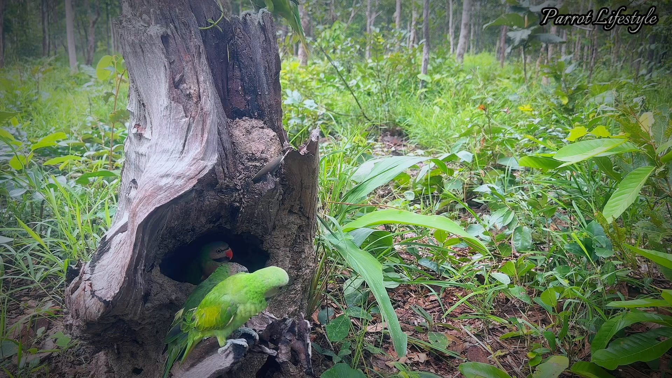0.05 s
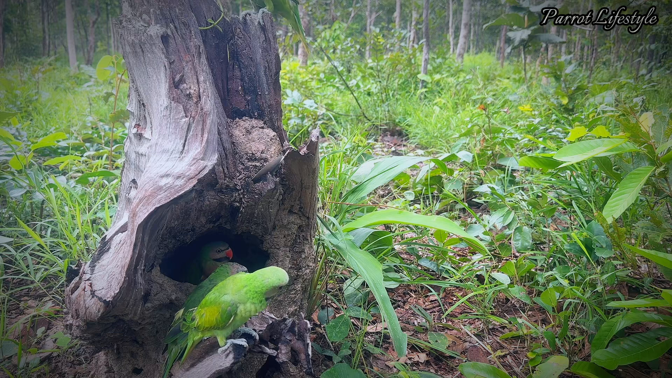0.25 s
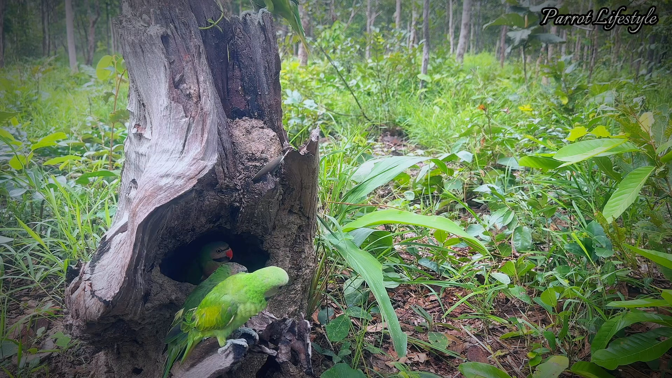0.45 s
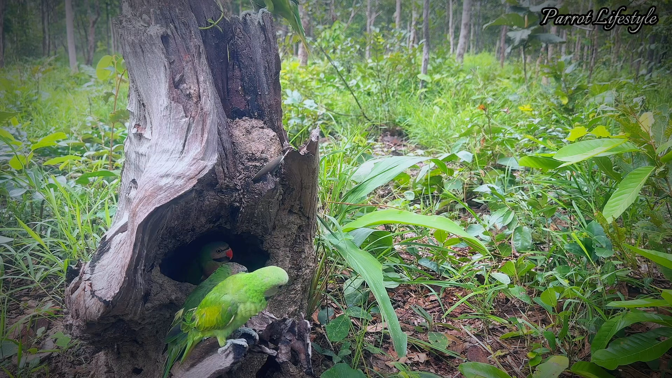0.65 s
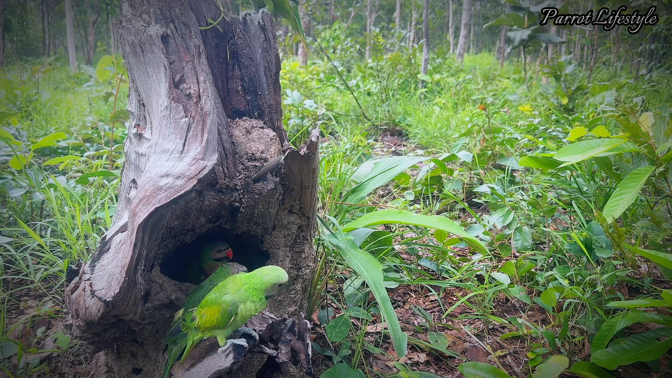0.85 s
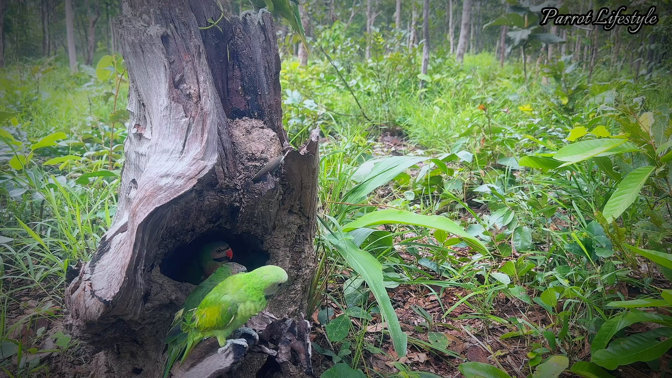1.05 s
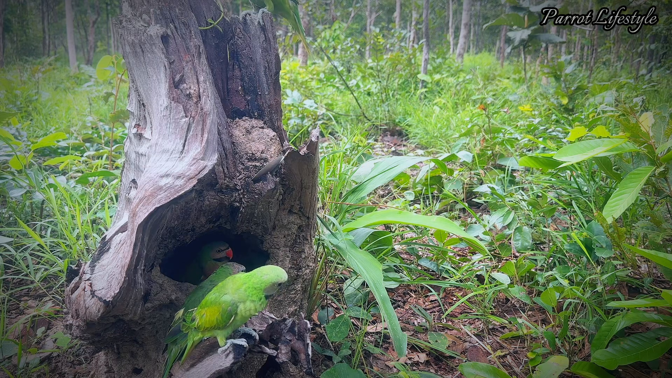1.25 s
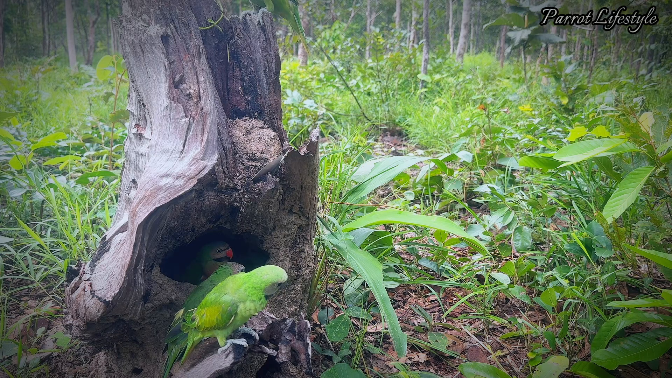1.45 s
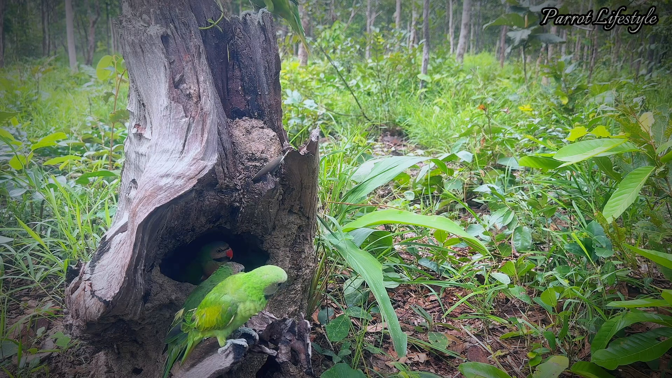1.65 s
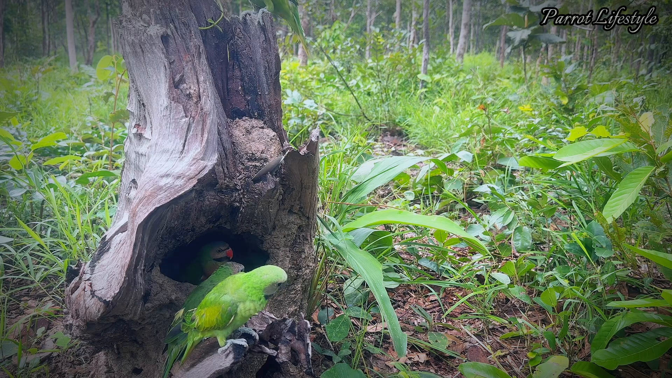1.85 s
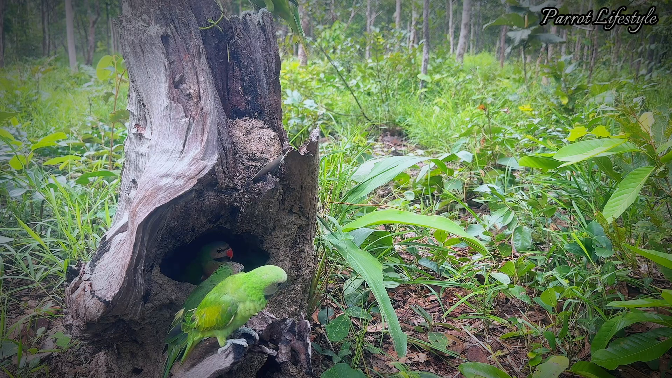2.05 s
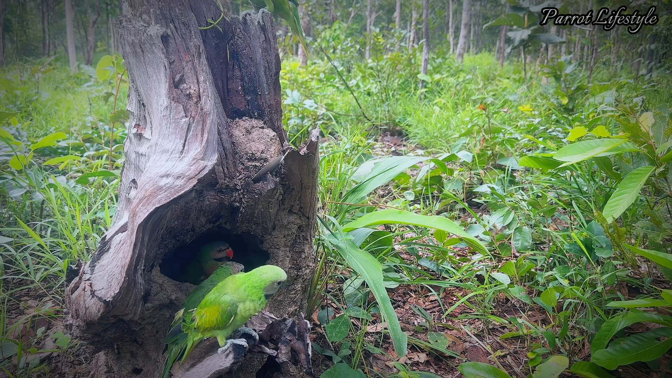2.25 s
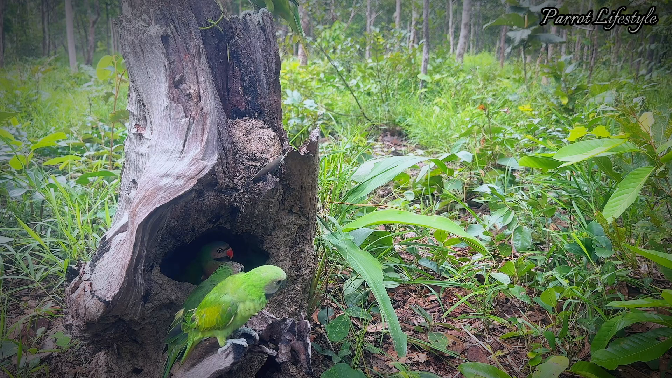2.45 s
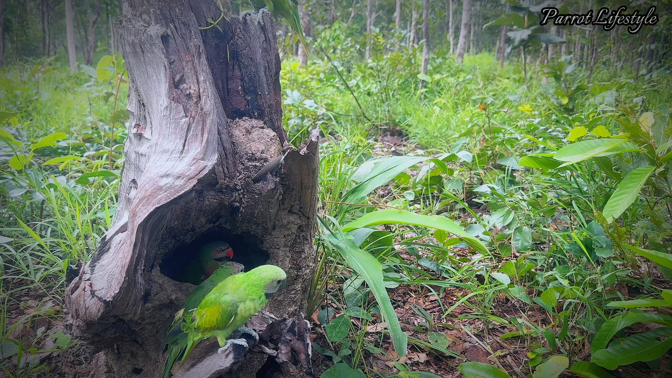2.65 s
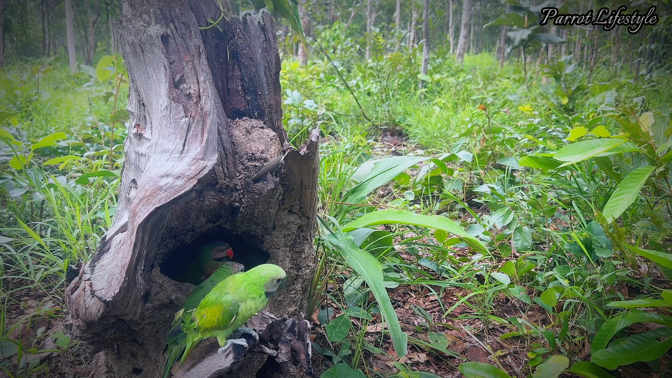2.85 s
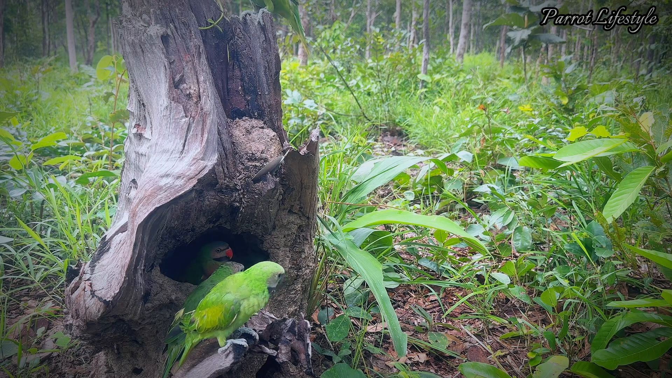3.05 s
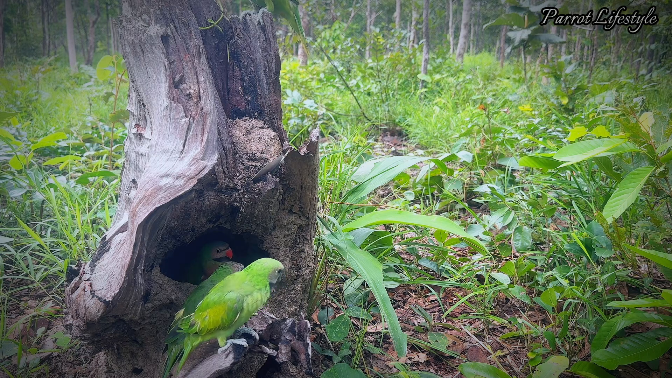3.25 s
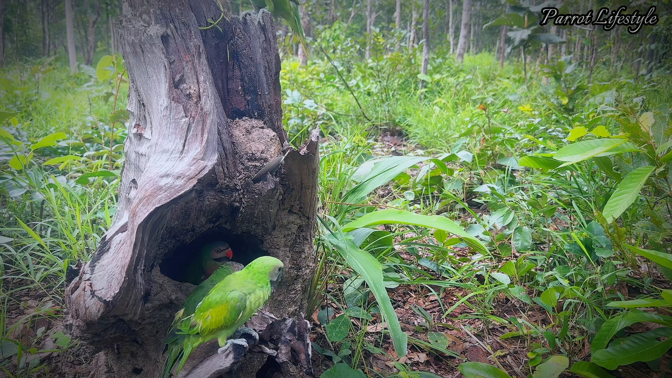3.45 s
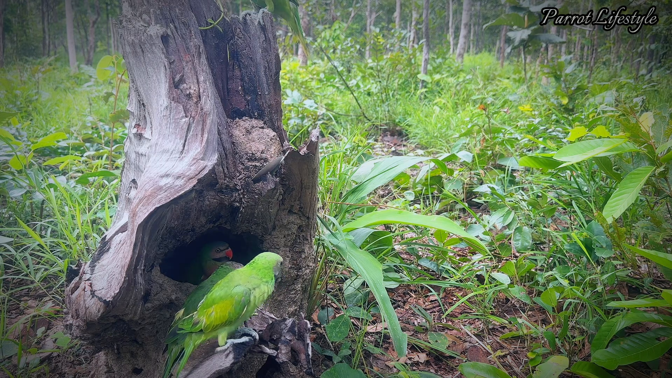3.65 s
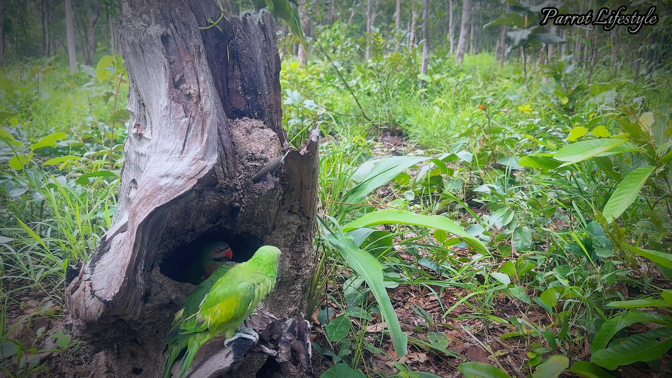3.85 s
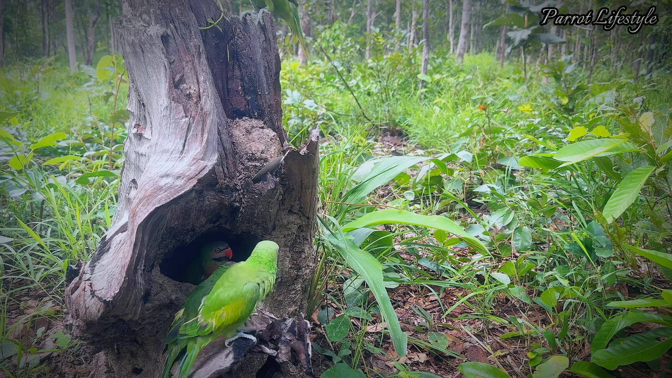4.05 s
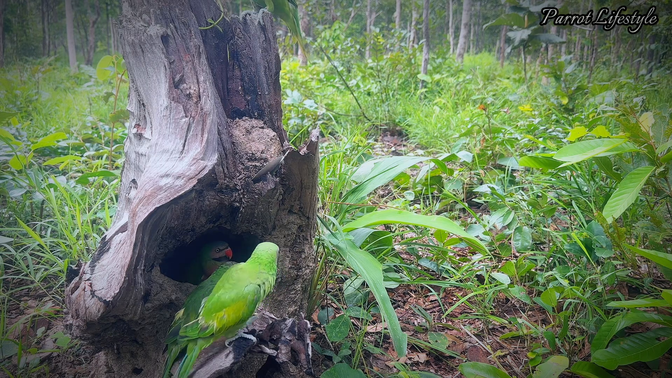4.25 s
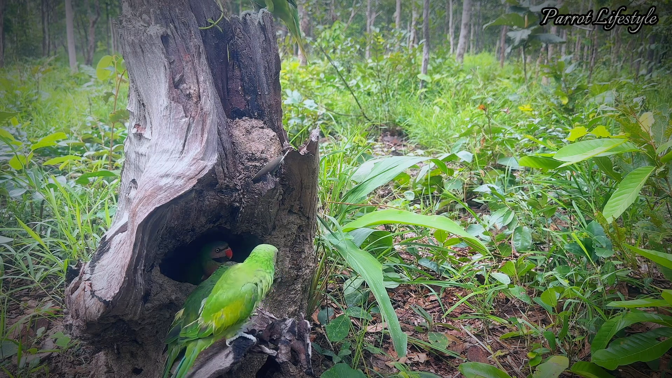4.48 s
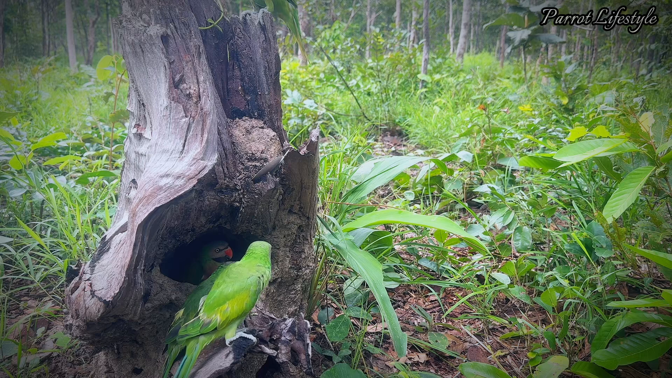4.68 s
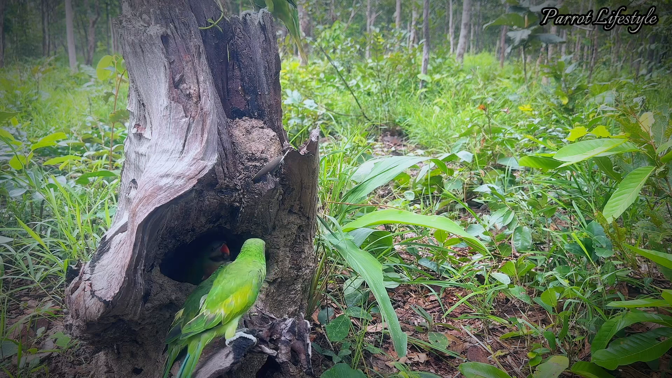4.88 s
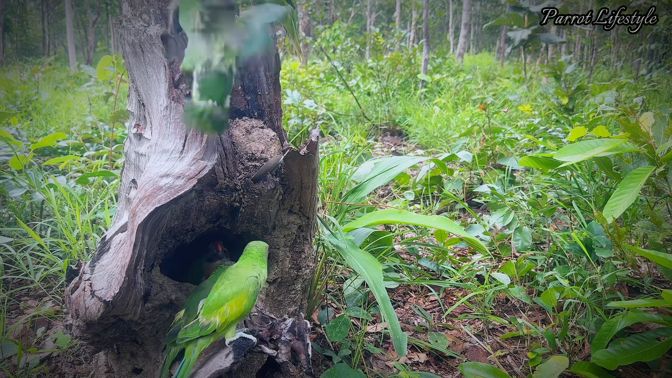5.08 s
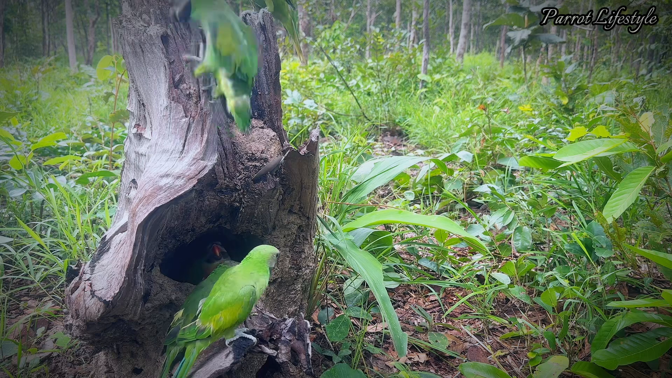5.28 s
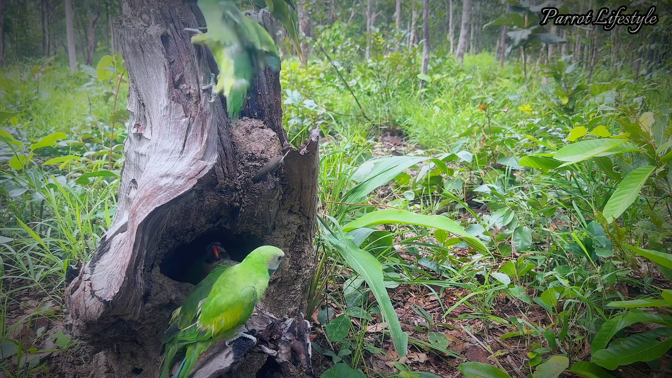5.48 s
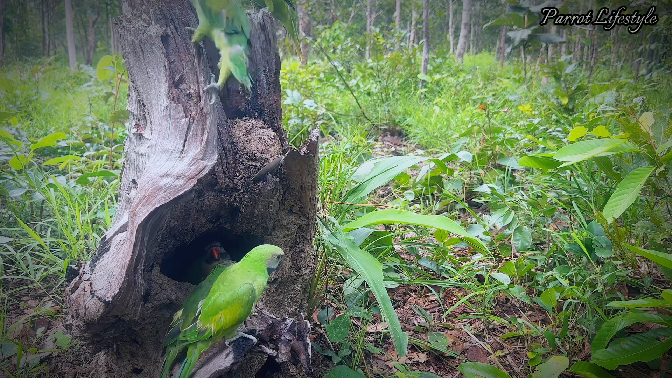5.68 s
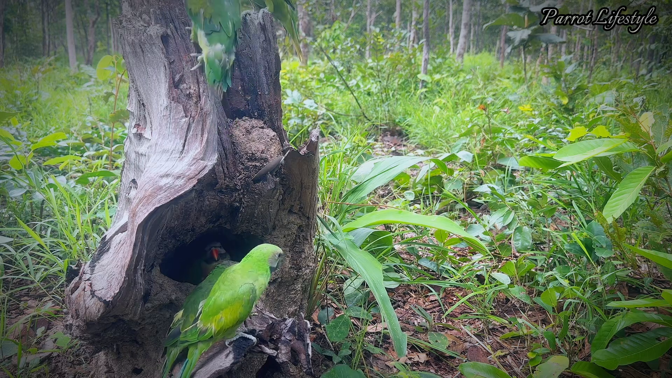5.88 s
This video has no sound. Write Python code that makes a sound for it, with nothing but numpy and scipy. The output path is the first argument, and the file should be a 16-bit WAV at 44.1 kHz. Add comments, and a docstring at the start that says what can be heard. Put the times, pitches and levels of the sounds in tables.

```python
"""Parakeets at a dead tree stump in a quiet wood: beaks and claws knock on it and pick off splinters.
One short squeak glides up and down, most likely a beak sticking and slipping on the wood.
A bird flutters in close to the microphone, lands on the trunk and scrabbles for a hold.
Far insects hiss throughout over a low rumble. Mono, with faint echoes from ground and trunks."""
import sys
import numpy as np
from scipy import signal
from scipy.fft import rfft, irfft, next_fast_len
from scipy.io import wavfile
from scipy.ndimage import map_coordinates

SR = 44100
rng = np.random.default_rng(int(sys.argv[2]) if len(sys.argv) > 2 else 0)


def materialize(psi):
    """Save the field psi as 16-bit PCM at rate SR to the path in sys.argv[1].

    A 1-D psi becomes a single channel; in a 2-D psi each row is a channel.
    """
    bounded = np.clip(np.atleast_2d(psi).T, -1, 1)
    quanta = np.round(bounded * 32767).astype(np.int16)
    wavfile.write(sys.argv[1], SR, quanta)


N = 261072

# spectrum of feathers rubbing on air and wood: (frequency [Hz], level [dB])
FEATHER_SPECTRUM = [(120, -9), (200, 1), (249, 1), (448, -1), (749, -1.5), (1100, -3.5), (1480, -1),
                    (2470, -8.5), (4950, -10), (5940, -20), (7270, -17), (16000, -31.5)]


def amp(db):
    """Decibels to gain."""
    return 10 ** (np.asarray(db) / 20)


def unit(x):
    """x at rms 1."""
    return x / np.sqrt(np.mean(x ** 2) + 1e-20)


def unit_peak(x):
    """x at peak 1."""
    return x / np.abs(x).max()


def unit_attack(x):
    """x at rms 1 over its first 10 ms."""
    return x / np.sqrt(np.mean(x[:SR // 100] ** 2))


def add(out, s, x):
    """Mix x into out from time s."""
    part = out[round(s * SR):][:len(x)]
    part += x[:len(part)]


def curve(points):
    """One value per sample through (time [s], value) points."""
    times, values = np.transpose(points)
    return np.interp(np.arange(N) / SR, times, values)


def wobble(rate):
    """A smooth random curve, rate knots a second."""
    return map_coordinates(rng.standard_normal(int(N * rate / SR) + 4), [np.arange(N) * rate / SR])


def swells(rows, shape=1.7):
    """Gain of movements that swell and fade alike: (middle [s], half length [s], level [dB])."""
    t = np.arange(N) / SR
    return sum(amp(db) * np.exp(-np.abs((t - s) / half) ** shape) for s, half, db in rows)


def colour(points, hz):
    """Gain of (frequency [Hz], level [dB]) points joined on a log axis."""
    f, db = np.transpose(points)
    return amp(np.interp(np.log(hz + 1), np.log(f + 1), db))


def filtered(x, response):
    """x through a complex response of frequency."""
    size = next_fast_len(len(x) + SR // 10)
    return irfft(rfft(x, size) * response(np.fft.rfftfreq(size, 1 / SR)), size)[:len(x)]


def resonance(f, hz, width):
    """Causal response of one resonance."""
    return 1j * f * width / (hz * hz - f * f + 1j * f * width)


def minimum_phase(spectrum, size=4096):
    """Impulse response with this spectrum and no sound ahead of the blow."""
    cepstrum = irfft(np.log(colour(spectrum, np.fft.rfftfreq(size, 1 / SR))))
    cepstrum[1:size // 2] *= 2
    cepstrum[size // 2 + 1:] = 0
    return irfft(np.exp(rfft(cepstrum)))


def noise(spectrum, grain_db=0):
    """Coloured noise of rms 1; grain_db clumps it into millisecond grains."""
    grains = rng.standard_normal(N) * amp(grain_db * wobble(900))
    return unit(filtered(grains, lambda f: colour(spectrum, f)))


def burst(length):
    """A crackle that dies by 30 dB in length seconds."""
    t = np.arange(SR // 10) / SR
    return rng.standard_normal(len(t)) * amp(-30 * t / length)


def forest(hiss_db=-65, rumble_db=-72, swell_hz=1.125, crest_s=0.36):
    """The wood in the distance: hiss, rumble and two insect bands, one steady, one swelling."""
    # spectra of the far hiss and rumble: (frequency [Hz], level [dB])
    hiss = [(250, -13.5), (450, -5), (800, -11.5), (1200, -7), (1700, -2), (2800, -1), (3900, -2.5),
            (5100, -1.5), (6200, -12), (7500, -10.5), (8500, -18), (9600, -30), (13500, -37.5),
            (16000, -44)]
    rumble = [(15, -64), (25, -28), (50, -9.5), (70, 2), (113, 0), (279, -13), (328, -12.5), (400, -22),
              (520, -39), (880, -120)]
    # far insects: (centre [Hz], width [Hz], level [dB], swing either way [dB])
    insects = [(4910, 760, -75.5, 0), (7180, 810, -88, 10)]
    t = np.arange(N) / SR
    out = amp(hiss_db + 0.11 * wobble(2.1)) * noise(hiss)
    out += amp(rumble_db + wobble(6)) * noise(rumble)
    for hz, width, db, swing_db in insects:
        band = unit(filtered(rng.standard_normal(N), lambda f: resonance(f, hz, width) ** 2))
        out += amp(db + swing_db * np.cos(2 * np.pi * swell_hz * (t - crest_s))) * band
    return out


def echoes(x, t60_s=0.18, delay_s=0.0072):
    """Ground and nearby trunks return a short, dense tail of reflections."""
    t = np.arange(SR // 4) / SR
    tail = rng.standard_normal(len(t)) * amp(-60 * t / t60_s) * (t > delay_s)
    return signal.fftconvolve(x, tail / np.linalg.norm(tail))[:N]


def rustle():
    """Feathers brush the wood, claws scratch for a hold, birds shuffle dully inside the hollow."""
    # movements at the stump: (middle [s], half length [s], level [dB])
    brushes = [(.28, 0.076, -68.5), (.55, 0.23, -69), (1.42, 0.13, -70), (4.675, 0.032, -55.5),
               (4.76, 0.11, -52), (4.98, 0.15, -63), (5.32, 0.12, -66.5), (5.85, 0.2, -71.5)]
    scratches = [(4.7, .06, -62), (5.02, 0.044, -64), (5.14, 0.041, -64.5), (5.31, 0.031, -62),
                 (5.38, 0.012, -58), (5.44, 0.022, -62)]
    shuffles = [(.3, 0.054, -65.5), (.7, 0.066, -72), (1.33, 0.25, -75), (2.56, 0.2, -74.5)]
    # spectra of claws and of shuffling: (frequency [Hz], level [dB])
    scratch_spectrum = [(600, -22), (2000, 4), (5000, 10.5), (7000, -6), (11000, -5), (15000, 0)]
    shuffle_spectrum = [(60, -10), (120, -6), (250, -5.5), (550, -12), (1000, -11.5), (2500, -22),
                        (6000, -50)]
    brushing = swells(brushes) * amp(2.6 * wobble(35)) * noise(FEATHER_SPECTRUM, grain_db=3.5)
    scratching = swells(scratches) * noise(scratch_spectrum)
    shuffling = swells(shuffles) * amp(1.9 * wobble(24.26)) * noise(shuffle_spectrum)
    return brushing + scratching + shuffling


def splinters(snap_s=0.016):
    """Dry fibres and bark flakes snap in short bright crackles."""
    # snaps: (time [s], peak level [dB])
    snaps = [(1.098, -41.5), (1.21, -52), (1.337, -39.5), (1.4176, -37.5), (2.246, -50), (2.256, -44),
             (2.264, -38), (2.521, -47), (2.865, -54.5), (5.121, -53), (5.167, -50), (5.789, -45),
             (5.83, -54)]
    # spectrum of a snap: (frequency [Hz], level [dB])
    spectrum = [(500, -34), (1500, -5.5), (3000, -4.5), (4800, 1), (6500, 0), (9000, -5.5), (12000, -12),
                (15500, -4.5)]
    out = np.zeros(N)
    for s, db in snaps:
        snap = filtered(burst(snap_s), lambda f: colour(spectrum, f))
        add(out, s, amp(db) * unit_peak(snap))
    return out


def squeak(jitter=0.04, scatter_db=2.4, grit_db=-11, rasp_db=-11, bite=0.7, travel_s=0.00222):
    """Stick and slip: each slip pulses the resonances; fast slips whistle, slow uneven ones creak."""
    # the glide: (time [s], slip rate [Hz])
    glide = [(3.3105, 380), (3.321, 550), (3.333, 900), (3.342, 1650), (3.344, 2480), (3.354, 2560),
             (3.358, 1400), (3.363, 1130), (3.374, 580), (3.399, 440), (3.404, 1070), (3.425, 1000),
             (3.444, 810), (3.452, 365), (3.501, 255)]
    # how hard the beak presses: (time [s], level [dB])
    pressure = [(3.310, -45), (3.327, -33.5), (3.3555, -32), (3.3585, -24.5), (3.384, -29), (3.412, -40),
                (3.463, -43), (3.502, -53)]
    # broad resonances under the slips, and the rasp of fibres: (frequency [Hz], level [dB])
    body_spectrum = [(200, -25), (420, -6), (950, -5), (1550, 0.5), (2150, -5), (2750, -3), (3500, -10),
                     (4500, -7.5), (5200, -4), (6100, -22), (7200, -33), (8250, -23), (9500, -46),
                     (14300, -56)]
    rasp_spectrum = [(1000, -32), (2700, -13), (4000, -1), (5200, -4), (6300, -1), (7200, -22), (8250, 6),
                     (9800, -18), (12300, -52), (14300, -12)]
    even_above_hz, roughest, smoothest = 750, 0.93, 0.19
    t = np.arange(N) / SR
    rate = np.exp(curve([(s, np.log(hz)) for s, hz in glide]))
    pressure_db = curve(pressure)
    force = amp(pressure_db) * (t > glide[0][0]) * (t < glide[-1][0])
    rough = smoothest + (roughest - smoothest) / (1 + (rate / even_above_hz) ** 6)
    cycles = np.cumsum(rate * (1 + jitter * rough * wobble(400))) / SR
    slips = np.interp(np.arange(1, int(cycles[-1])), cycles, np.arange(N))
    at = slips.astype(int)
    scatter = amp(scatter_db * rough[at] * rng.standard_normal(len(at)))
    push = force[at] * np.sqrt(SR / rate[at]) * scatter
    # a windowed sinc places each pulse between samples
    taps = at[:, None] + np.arange(-7, 9)
    lag = taps - slips[:, None]
    pulses = push[:, None] * np.sinc(lag) * np.sinc(lag / 8)
    drive = np.bincount(np.clip(taps, 0, N - 1).ravel(), pulses.ravel(), N)
    # loose grit crunches under every slip
    after_slip = unit(np.exp(-2 * (cycles % 1)))
    grit = amp(grit_db) * force * rough * after_slip * rng.standard_normal(N)
    body = minimum_phase(body_spectrum)
    voice = signal.fftconvolve(drive + grit, body / np.linalg.norm(body))[:N]
    # bending waves in wood carry the highs faster than the lows, which spreads each pulse
    voice = filtered(voice, lambda f: np.exp(-2j * np.pi * travel_s * (2 * np.sqrt(1000 * f) - f / 2)))
    # fibres rasp right after each slip, more so under rough, hard pressure
    grip = amp(bite * (pressure_db - pressure_db.max()))
    rasp = force * rough * grip * after_slip * noise(rasp_spectrum)
    return voice + amp(rasp_db) * rasp


def wing_flicks(flick_s=0.0031):
    """The wing tips of the landing bird flick the trunk."""
    # feather strikes: (time [s], peak level [dB], treble tilt [dB/octave])
    flicks = [(4.688, -26.5, 3.5), (4.6995, -31, 10.5), (4.703, -23.5, 2.5), (4.825, -22, 4),
              (4.8975, -25, 2.5), (4.9066, -22.5, -1.5)]
    out = np.zeros(N)
    for s, db, tilt_db in flicks:
        response = lambda f: colour(FEATHER_SPECTRUM, f) * amp(tilt_db * np.log2(1 + f / 1000))
        add(out, s, amp(db) * unit_peak(filtered(burst(flick_s), response)))
    return out


def wingbeats(beats=5, start_s=4.698, beat_s=0.063, braking_s=0.0063, thump_s=0.0043):
    """Beats slow as the bird brakes; each stroke rushes in the feathers and pushes air at the mic."""
    # spectrum of the swirling air: (frequency [Hz], level [dB])
    air_spectrum = [(20, -22), (38, -6), (62, 1), (85, 5.5), (125, -3.5), (220, -12), (380, -8.5),
                    (700, -36)]
    closest_beat, fade_db_per_beat, thump_db, swirl_db = 1, 2, 4, -3
    t = np.arange(N) / SR
    rush, push, thumps = np.zeros((3, N))
    for stroke in range(2 * beats):
        beat, upstroke = stroke / 2, stroke % 2
        s = start_s + beat_s * beat + braking_s * beat * (beat - 1) / 2
        rush_db = -42 - 13 * upstroke
        push_db = -42.5 - fade_db_per_beat * abs(beat - closest_beat) - 1.5 * upstroke
        rush += swells([(s, 0.012, rush_db)], shape=1.16)
        push += swells([(s, 0.021, push_db)], shape=1.3)
        # the passing wing presses, sucks and presses again
        passing = (t - s) / thump_s
        thumps += amp(push_db + thump_db) * (2 * passing ** 2 - 1) * np.exp(-passing ** 2)
    feathers = rush * noise(FEATHER_SPECTRUM, grain_db=2.0)
    swirl = amp(swirl_db) * push * noise(air_spectrum)
    return feathers + thumps + swirl


def knocks(focus=1.8, skid=0.076, ring_share=0.89):
    """Soft blows wake the stump's low modes, hard ones its high modes and a crack that grows with skid."""
    # beak and claw blows: (time [s], attack level [dB], tone centre [Hz], contact length [s])
    blows = [(.548, -62.5, 1100, .002), (.577, -61.5, 900, .002), (.6, -53, 1190, 0.0031),
             (.948, -64, 1430, .002), (1.714, -45.5, 1330, 0.0087), (1.722, -63, 290, 0.0044),
             (4.701, -40.5, 1760, 0.0011), (4.752, -43, 1340, .004), (4.8208, -43, 1190, 0.0036),
             (4.9029, -41.5, 2000, 0.019), (4.9078, -44.5, 444, 0.0066), (4.984, -33.5, 1920, 0.013),
             (4.9887, -36, 1120, .0068), (5.0102, -35, 790, 0.002), (5.068, -48, 1960, 0.004),
             (5.332, -45, 1680, 0.0066), (5.3728, -44.5, 2710, 0.0011), (5.3763, -52, 340, 0.013),
             (5.766, -60, 3770, .005), (5.788, -50.5, 2200, 0.0023)]
    # modes of the untouched stump: (frequency [Hz], level [dB], t60 [s])
    modes = [(280, -5.5, 0.022), (506, -9, 0.025), (830, -9.5, 0.031), (936, -1, 0.037),
             (1195, -1.5, 0.015), (1437, -0.5, 0.034), (1675, -3, 0.026), (2090, 2, 0.015),
             (2540, 0, 0.024), (2770, 4.5, 0.021), (3190, 11, 0.0033), (3670, -3.5, 0.023),
             (4470, 5, 0.0048)]
    # spectrum of the crack on contact: (frequency [Hz], level [dB])
    crack_spectrum = [(300, -17), (700, -2), (1200, 2), (2800, -3.5), (4800, 1.5), (6200, -12.5),
                      (9000, -22), (15000, -23)]
    out, t = np.zeros(N), np.arange(SR // 10) / SR
    for s, db, tone_hz, contact_s in blows:
        ring = np.zeros(len(t))
        for k, (hz, mode_db, t60) in enumerate(modes):
            damped_t60 = t60 * ring_share  # feet and beak shorten the ring
            decay = amp(mode_db + rng.normal(0, 2.0) - 60 * t / damped_t60)
            weight = (-1) ** k / (1 + (focus * np.log2(hz / tone_hz)) ** 2)
            detuned_hz = hz * (1 + rng.normal(0, 0.043))
            ring += weight * decay * np.sin(2 * np.pi * detuned_hz * t)
        # the claw lands, then skids for a moment
        force = skid * burst(contact_s)
        force[0] = 1
        knock = signal.fftconvolve(ring, force)[:len(t)]
        crack = filtered(burst(contact_s + 0.0053), lambda f: colour(crack_spectrum, f))
        crack_db = -10 + 7.5 * np.log2(tone_hz / 1500) + 5 * np.log2(contact_s / 0.004)
        add(out, s, amp(db) * (unit_attack(knock) + amp(crack_db) * unit_attack(crack)))
    return out


def scene(echo_db=-19):
    """The birds close to the microphone, faintly echoed; the forest far behind."""
    birds = squeak() + knocks() + splinters() + wing_flicks() + wingbeats() + rustle()
    return (birds + amp(echo_db) * echoes(birds) + forest())[None]


def record(dry, low_cut_hz=39, top_hz=15900):
    """A mono camera microphone: the deepest bass is cut and nothing passes above its band limit."""
    low_cut = lambda f: 1 / np.sqrt(1 + (low_cut_hz / (f + 1)) ** 20)
    top_cut = lambda f: 1 / np.sqrt(1 + (f / top_hz) ** 160)
    return filtered(dry[0], lambda f: low_cut(f) * top_cut(f))[None]


dry = scene()
out = record(dry)
materialize(out)
```